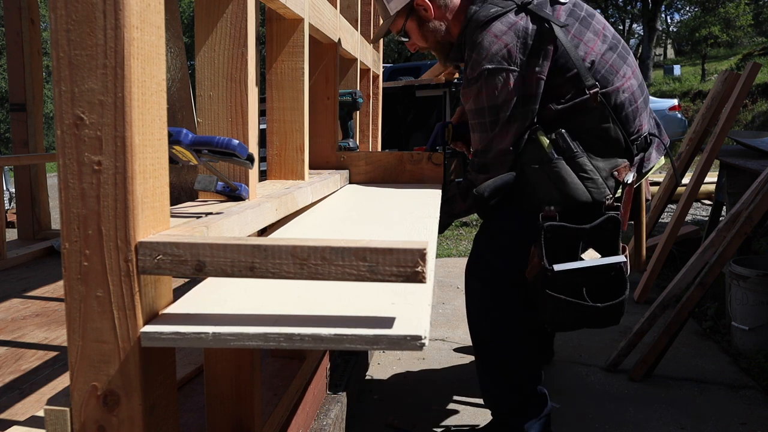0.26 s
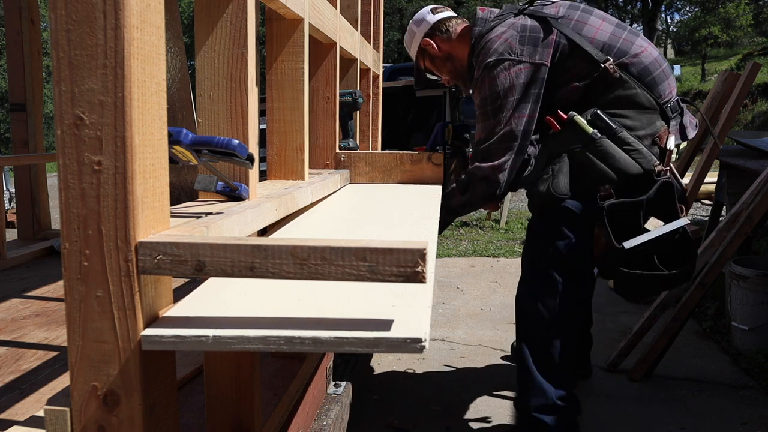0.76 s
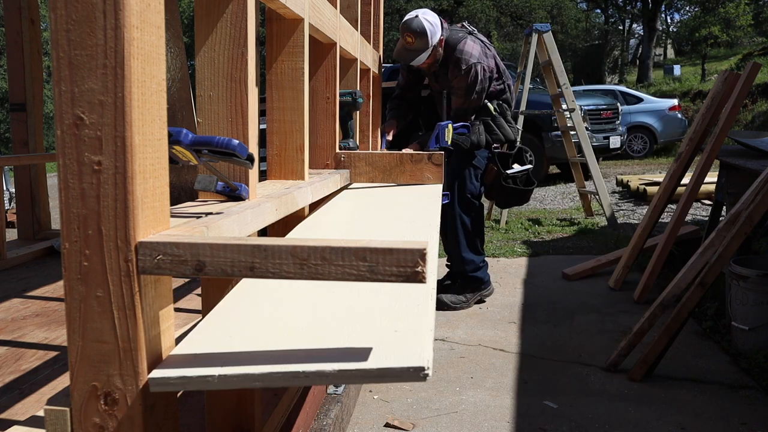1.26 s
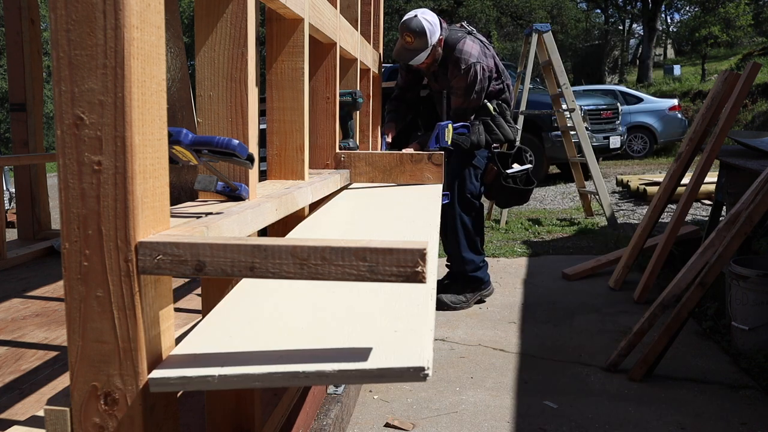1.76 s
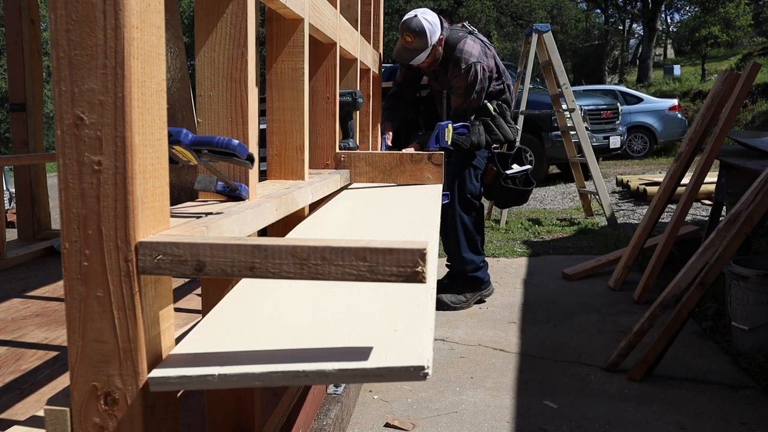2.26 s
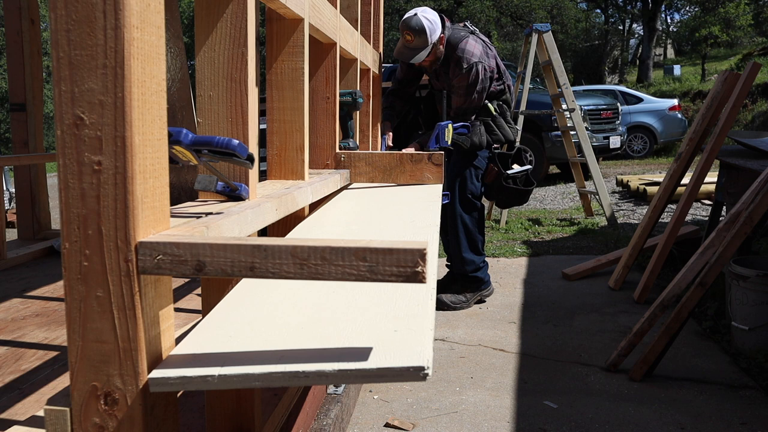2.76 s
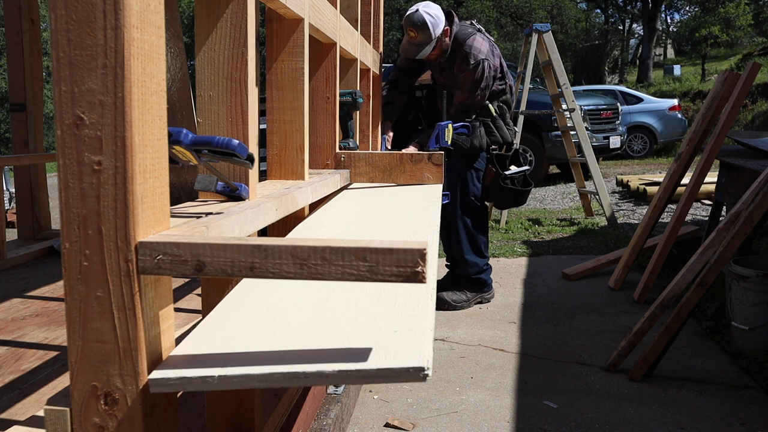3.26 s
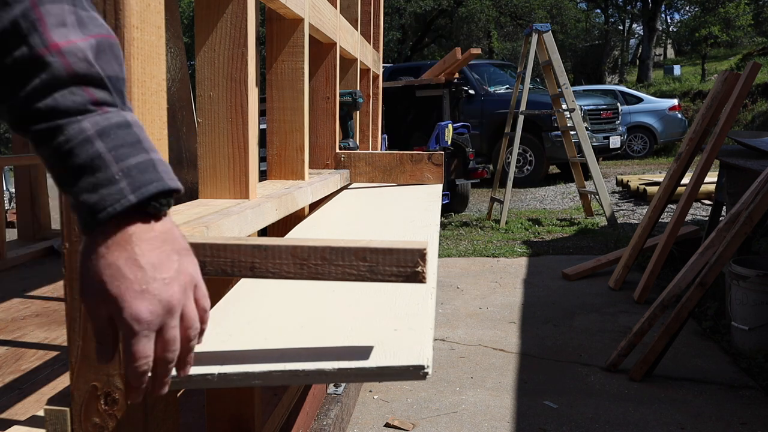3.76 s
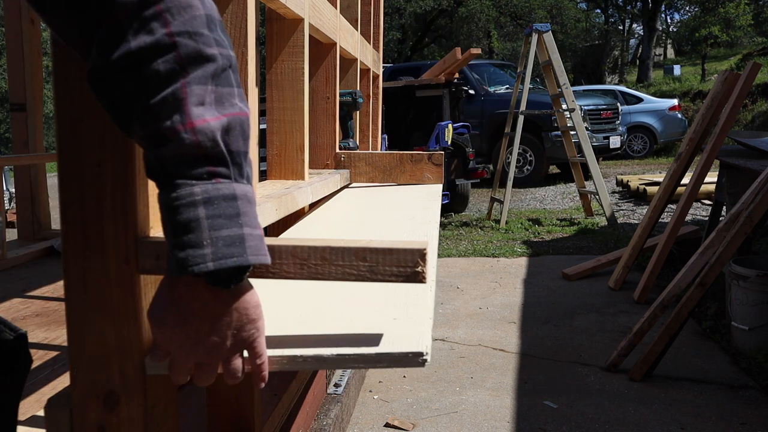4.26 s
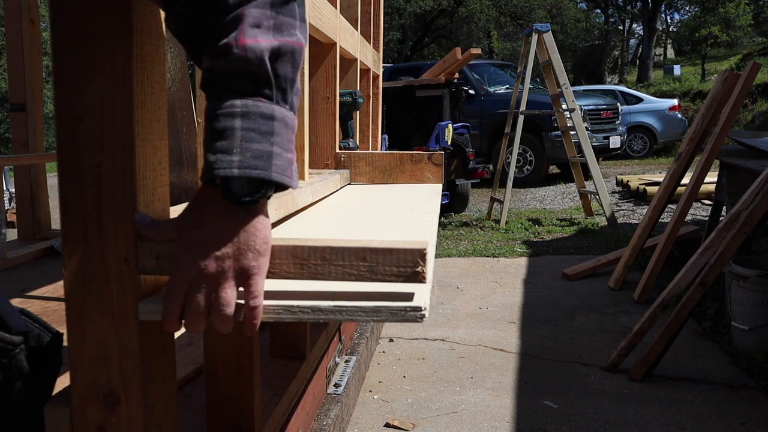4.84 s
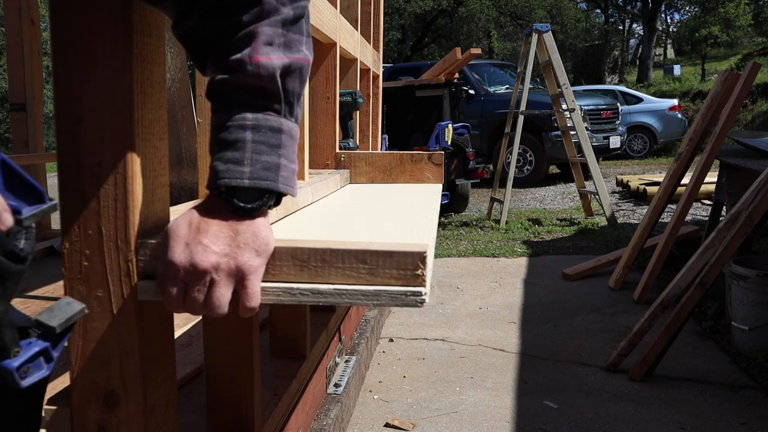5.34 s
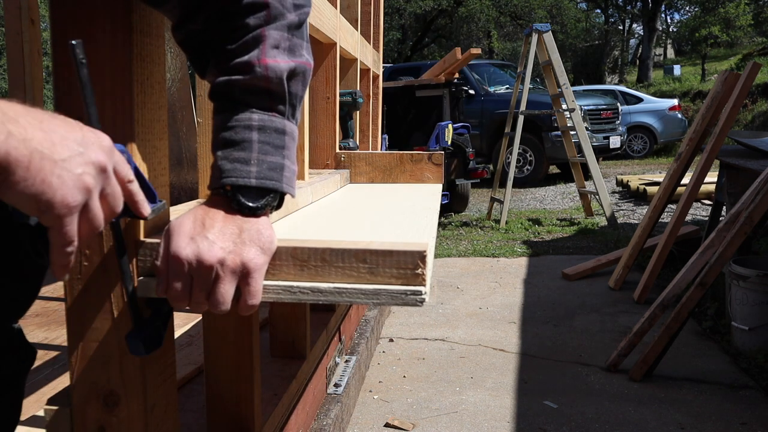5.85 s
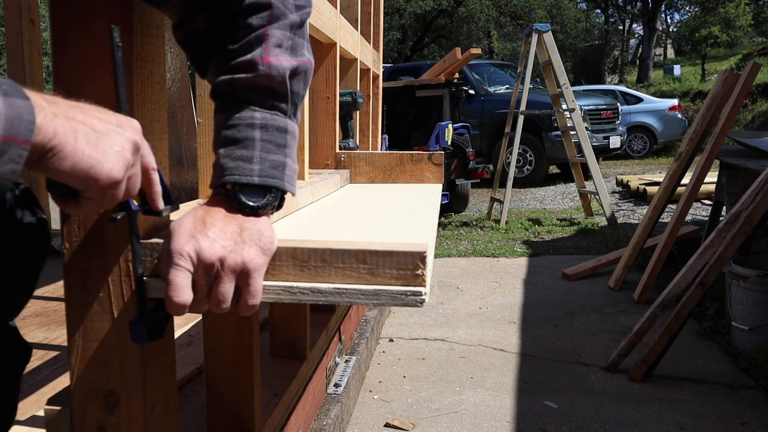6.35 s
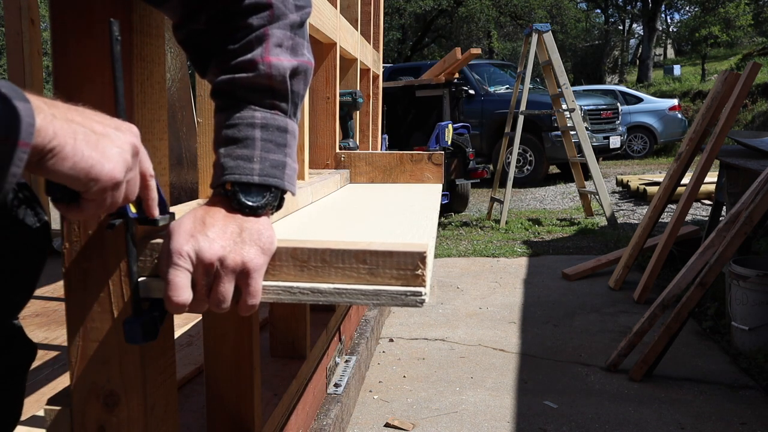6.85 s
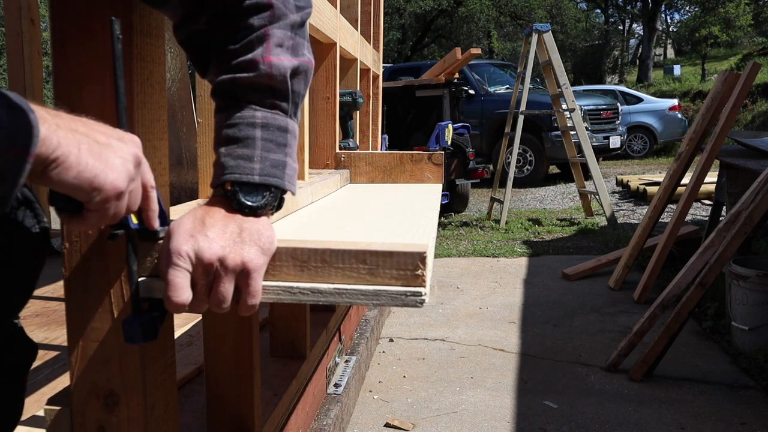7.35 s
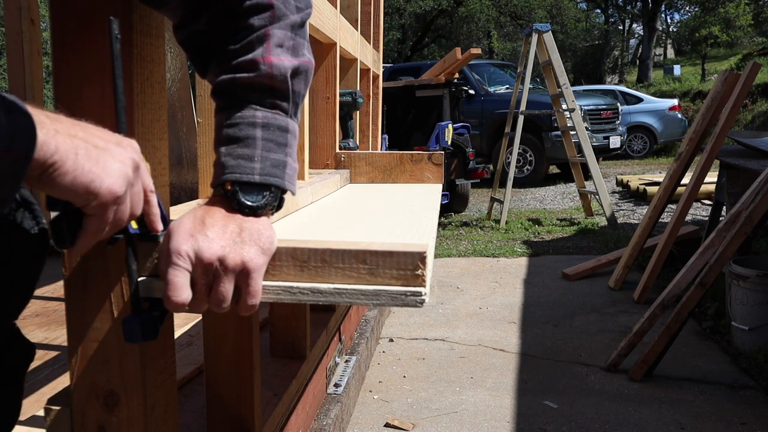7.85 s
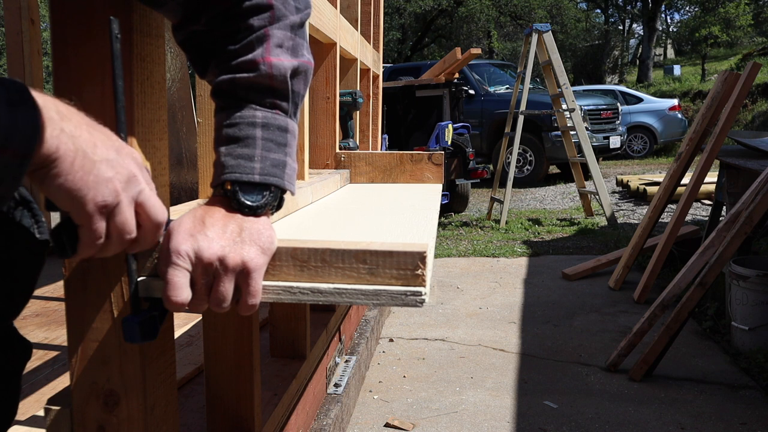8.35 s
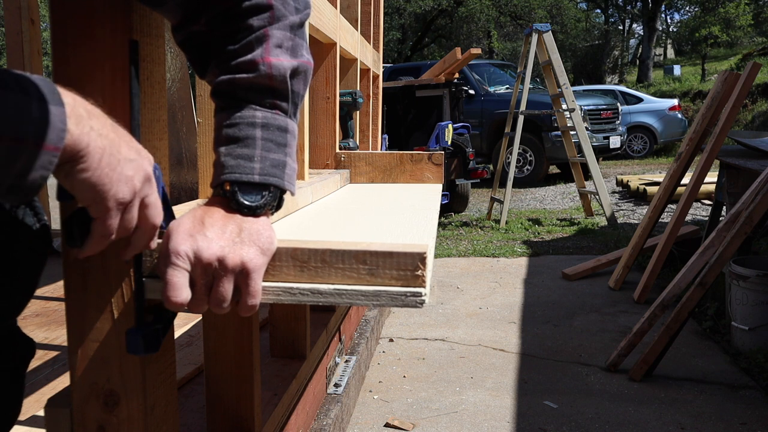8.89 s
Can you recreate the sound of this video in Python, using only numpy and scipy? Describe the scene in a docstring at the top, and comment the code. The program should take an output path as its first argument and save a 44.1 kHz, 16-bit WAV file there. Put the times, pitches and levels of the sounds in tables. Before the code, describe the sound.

A quiet open yard with soft air and microphone hiss and a barely audible high whine. From 0.3 to 1.1 s, somewhat distant boards knock and rub; from 1.0 to 2.1 s a clamp trigger clicks five times, about four per second, each with a loose metallic rattle. A faint far bird gives four tiny whistles around 2.2-2.6 s, while a knock leaves a low board hum; another knock lands at 2.7 s, then a lull. From 3.5 s everything is close: a woody shove at 3.9 s, hand rubbing, scratchy chirps and a brief rising squeak at 4.1-4.5 s, then board scrapes until 5.5 s. Knocks at 5.7-6.4 s peak in hard wood and steel blows. Four loud, dry pumps follow at 6.55, 6.8, 7.03 and 7.3 s. Light taps and clicks continue, then a very sharp metal snap at 8.6 s and clattering knocks until 9 s.

```python
"""Boards are clamped to a timber frame in an open yard, over quiet air, microphone hiss and a faint whine.
At first the work sounds far off: boards knock and the pumped trigger clicks, then a far bird whistles.
From about 3.5 s it sounds close: hands rub, squeaks and short high tones sound, a board slides on its bracket.
Then come hard knocks, four louder pumps and a last burst of clicks and knocks.
Blows ring fixed tones, rubbing drives resonances with tiny random catches, squeaks are gliding sines."""
import sys
import numpy as np
from scipy import signal
from scipy.fft import rfft, irfft
from scipy.io import wavfile
from scipy.ndimage import uniform_filter1d

SR = 44100
rng = np.random.default_rng(int(sys.argv[2]) if len(sys.argv) > 2 else 0)


def dump(signal):
    """Clip the signal to [-1, 1] and save it as 16-bit WAV at the path in sys.argv[1]."""
    limited = np.clip(np.atleast_2d(signal).T, -1, 1)
    pcm = np.round(limited * 32767).astype(np.int16)
    wavfile.write(sys.argv[1], SR, pcm)


N = 402191

# Colour of air and microphone hiss. Each row: frequency in Hz, relative level in dB per Hz.
AIR_COLOUR = [(13, -35), (22, 17.5), (43, 4), (84, 6.5), (172, -15), (371, -7.5), (530, -7), (970, -9.5),
              (1500, -17), (1680, -24), (2210, -23.5), (14300, -23), (15500, -19)]
AIR_DB = -51.5
WHINE_HZ, WHINE_WIDTH_HZ, WHINE_DB = 14805, 12, -78
# A far bird. Each row: start in seconds, start pitch in Hz, end pitch in Hz, length in seconds, level in dB.
BIRD_CHIRPS = [(2.207, 3680, 4080, 0.034, -56), (2.306, 4020, 4050, 0.034, -57),
               (2.406, 3900, 4100, .03, -60), (2.503, 3840, 4230, 0.076, -60)]
# Long low ringing of the timber frame. Each row: start in seconds, pitch in Hz, level in dB, time to fall 60 dB
# in seconds, seconds until it is held.
FRAME_HUMS = [(2.19, 186, -45, 4.0, .48), (2.73, 110, -48, 8.0, .78), (5.71, 165, -42, .6, .3),
              (7.354, 200, -46, .4, .3), (7.64, 190, -44, .5, .3), (7.954, 175, -47, .5, .3),
              (8.237, 210, -42, .4, .3)]

# Steady handling. Each row: time in seconds, rub level in dB, fine hiss level in dB,
# level of the frame's shudder in dB.
HANDLING_LEVELS = [(0.0, -57, -68, -57), (0.15, -49.5, -60, -57), (0.56, -49, -54.5, -49.5),
                   (0.68, -51, -68, -58), (1.2, -59, -63, -46.5), (1.95, -60.5, -69, -53.5),
                   (2.16, -51, -76, -43), (2.3, -55.5, -68, -49), (3.43, -58, -63.5, -54.5),
                   (3.55, -47.5, -66.5, -53), (4.04, -46, -55.5, -53), (4.75, -56.5, -61.5, -53),
                   (5.76, -56, -63.5, -49.5), (6.25, -48.5, -61, -47.5), (6.6, -56, -63.5, -45.5),
                   (7.3, -58.5, -72, -53.5), (8.4, -57.5, -65, -52.5), (9.12, -53.5, -61.5, -42)]
# Single strokes of hand or board. Each row: start in seconds, length in seconds, rub in dB, fine hiss in dB.
HAND_STROKES = [(0.42, 0.078, -40.5, -41.5), (.74, 0.12, -48.5, -55), (.84, 0.058, -43.5, -71),
                (3.494, 0.28, -59, -56.5), (3.898, 0.071, -35, -41), (4.127, 0.071, -59, -77),
                (4.341, 0.086, -51.5, -58), (4.83, .2, -51, -74), (5.28, .14, -48, -80),
                (5.921, 0.068, -48, -54), (6.106, 0.08, -62, -52.5), (6.33, 0.082, -44, -55),
                (6.389, 0.056, -43.5, -61), (7.508, 0.048, -51, -55), (7.595, 0.053, -49.5, -52),
                (7.748, 0.058, -59, -57), (8.595, 0.054, -56, -47), (8.708, 0.054, -53, -58.5),
                (8.827, 0.063, -45, -63)]
# The near board slides up along its bracket. Each row: start in seconds, length in seconds,
# scrape in dB, fine hiss in dB.
BOARD_SLIDES = [(4.66, 0.094, -46, -67), (4.79, 0.073, -49, -59), (4.88, 0.072, -42, -70),
                (5.18, 0.22, -44, -67), (5.41, 0.091, -38.5, -62)]
# The frame is leant on or jolted. Each row: start in seconds, length in seconds, level in dB.
FRAME_JOLTS = [(.82, 0.31, -41.5), (1.52, 0.12, -52), (1.75, 0.18, -47), (2.7, 0.18, -49), (5.2, 0.18, -44),
               (5.82, 0.11, -43), (6.28, 0.199, -31.5), (8.6, 0.16, -47.5), (8.78, 0.18, -36)]
# Resonances of the rub, its fine hiss, the sliding board and the frame.
# Each row: frequency in Hz, width in Hz, relative level in dB.
RUB_PEAKS = [(515, 550, 5), (1324, 237, 6.5), (1650, 350, 3.5), (2500, 540, 5), (3100, 2400, -1)]
HISS_PEAKS = [(4130, 2500, 2), (6240, 5100, 1.5), (8830, 1630, 1.5), (12700, 2000, -14.5)]
SLIDE_PEAKS = [(1340, 130, 3), (1800, 350, -1), (2350, 400, -1), (3200, 800, -11)]
SHUDDER_PEAKS = [(81, 18, -17), (123.6, 44, -0.5), (178, 63.7, 2), (225, 54.3, 2.5), (300, 131, -4),
                 (456, 155, -5.5), (606, 172, -10)]
RUB_TOP_HZ, SHUDDER_FLICKER_DB = 3130, 1.5

# Stick-slip squeaks, a full and a thin one. Each row: time in seconds, pitch in Hz, level in dB.
FULL_SQUEAK = [(4.378, 1540, -52), (4.415, 1560, -50), (4.426, 1600, -58), (4.434, 1650, -43),
               (4.464, 1680, -44), (4.472, 1800, -53), (4.482, 1870, -47), (4.51, 1870, -50),
               (4.545, 1860, -57)]
THIN_SQUEAK_CURVE = [(4.03, 12000, -77), (4.058, 12103, -56), (4.078, 12300, -70), (4.16, 12150, -48),
                     (4.174, 12200, -65), (4.26, 12129, -71), (4.27, 12500, -81)]
# Tones inside each squeak. Each row: multiple of the pitch, relative level in dB.
FULL_SQUEAK_TONES = [(1, 0), (2, -13), (3, -18), (4, -22)]
THIN_SQUEAK_TONES = [(1, 3), (.5, -11)]
# Short scratchy high tones, gliding a little. Each row: start in seconds, start pitch in Hz,
# end pitch in Hz, length in seconds, level in dB.
HIGH_CHIRPS = [(4.13, 2170, 2130, 0.035, -41.5), (4.338, 6000, 6130, .03, -48),
               (4.338, 10100, 10200, 0.026, -50), (4.35, 3580, 3700, 0.012, -45),
               (4.355, 11900, 11800, .04, -61), (4.38, 4280, 4100, 0.018, -48),
               (4.385, 6500, 7000, 0.091, -52), (4.385, 13200, 13400, .06, -59)]

# Wood on wood. Each row: time in seconds, loudness at the loudest moment in dB, brightness in dB per octave.
BOARD_KNOCKS = [(0.421, -27.5, -1), (0.487, -37, 2.5), (0.865, -29, -3.5), (0.885, -31, -4.5),
                (0.95, -24.5, -7.5), (1.007, -27.5, -8), (1.257, -32, 0), (1.328, -39, 7),
                (1.632, -31, -24.5), (1.683, -39.5, -18), (1.756, -33, 14), (2.178, -29.5, -5.5),
                (2.589, -50, 5), (2.727, -25, 7.5), (3.365, -41, 9), (3.554, -33, 3.5), (3.928, -32, -1),
                (4.332, -35.5, 6.5), (4.39, -35, 10.5), (5.185, -35, 0), (5.266, -32.5, 0.5),
                (5.711, -37.5, -1.5), (5.824, -26, -1.5), (5.943, -35, -1), (6.199, -16.5, 0.5),
                (6.298, -18.5, 10), (6.421, -25.5, -2), (6.654, -36.5, -8), (7.088, -42, 0),
                (7.352, -37, -5), (7.64, -35, -5), (7.788, -37, 14), (7.954, -40.5, -11),
                (8.239, -35.5, -4), (8.585, -22, -3.5), (8.791, -27, -6), (8.822, -22.5, 3.5),
                (8.946, -23.5, 3), (8.968, -24, -18.5)]
# A board end dragged home, swelling before it stops. Each row: time in seconds, loudest level in dB,
# brightness in dB per octave, narrowness in dB per octave squared (below 0 counts as 0),
# time for the chatter to fall 60 dB in seconds (above 0.3 counts as 0.3).
BOARD_SHOVES = [(0.29, -40, -5, 3.5, 0.12), (0.421, -31.5, 12, 7.5, 0.42), (0.78, -37, 4, -1.5, 0.39),
                (1.005, -49, 6, -3, 0.11), (2.572, -37, -2, 2.5, 0.19), (2.705, -40, 1.5, 0, 0.2),
                (3.51, -45, 6, 4, 0.13), (3.899, -21.5, 0.5, 4.5, 0.15), (8.582, -39, -1, -2.5, 0.4)]
# Ringing tones of boards and of the clamp.
# Each row: frequency in Hz, relative level in dB, time to fall 60 dB in seconds.
BOARD_MODES = [(118.3, -12.5, 0.23), (174, -4.5, 0.37), (207.4, 7, 0.063), (255.3, -1.5, 0.18),
               (320.4, 3, 0.044), (424, -10.5, 0.13), (460.8, -7.5, 0.18), (487, 1, 0.038),
               (573.6, 0.5, 0.074), (710, 0, 0.034), (875, 1, 0.025), (1013, 0, 0.033), (1180, 6.5, 0.011),
               (1410, -4, 0.022), (1850, -4, 0.011), (2104, -4, 0.023), (2430, 9.5, 0.0028),
               (3550, -9, 0.024), (4400, -8, 0.01), (6000, 1, 0.0019), (8700, -0.5, 0.0019),
               (13000, -6, 0.0015)]
CLAMP_MODES = [(720, 8, 0.018), (950, -27, 0.011), (1110, -35, 0.0048), (1284, 20.5, 0.014),
               (1657, 19, 0.0094), (2210, -6.5, 0.027), (2520, -4, 0.002), (2910, 18.5, 0.0018),
               (3330, -24, 0.022), (3400, -12, 0.032), (4160, 1, 0.01), (4152, -3.5, 0.011),
               (5000, 9, 0.0014), (5480, -4, 0.0088), (7020, 5, 0.0015), (8060, -6, 0.0082),
               (8470, -8.5, 0.0067), (9210, -8, 0.01), (9900, 0, 0.0011), (12100, -13, 0.0061),
               (13500, -12, 0.0025)]
MODE_SPREAD_DB = 2.5   # the strike point changes from blow to blow
# The struck part rebounds. Each row: delay after the snap in seconds, share of the snap's size.
REBOUNDS = [(.0042, 0.2), (.0075, 0.38)]
KNOCK_T60_S, USUAL_DB = 0.053, -30   # chatter time of a knock at the usual level
LONGER_PER_DB = 0.25   # harder knocks stay in contact longer: dB of time per dB of level
KNOCK_NARROW_DB, NARROW_PER_BRIGHT = 1.5, 0.89   # a brighter knock is also more hollow

# Trigger pumps, where the pawl snaps over. Each row: time in seconds, loudest level in dB.
TRIGGER_PUMPS = [(1.0209, -29), (1.257, -29.5), (1.5067, -28.5), (1.7554, -30.5), (2.0744, -33),
                 (6.5518, -19.5), (6.7947, -20.5), (7.033, -20), (7.2851, -21.5)]
# Other clicks of the clamp. Each row: time in seconds, loudest level in dB, brightness in dB per octave.
CLAMP_CLICKS = [(0.44, -26.5, 13), (0.5523, -45, 4), (0.633, -32, 6), (0.681, -30.5, 7),
                (0.838, -35.5, 6.5), (0.9425, -48.5, 1), (1.0035, -42, -18), (1.6255, -46.5, -1),
                (1.737, -44, 8), (1.86, -46, -8), (2.066, -33, -16), (2.159, -36, 2), (2.5879, -29.5, 3.5),
                (2.7047, -36, 3.5), (2.7238, -29.5, -4), (3.1327, -47.5, 0), (3.367, -41, -5),
                (3.556, -31, 17.5), (3.678, -39, 29), (3.8734, -25.5, 23), (3.9064, -31.5, 28),
                (4.1842, -36, 21), (4.888, -44, -20), (5.0622, -32, 12.5), (5.251, -36, -13),
                (5.7147, -31, 0.5), (5.827, -29.5, -7.5), (5.932, -41, -14), (5.9562, -36, -7),
                (6.049, -41, 2.5), (6.0875, -37, 1.5), (6.2005, -27, -3), (6.2964, -18.5, 9),
                (6.355, -34, 18), (6.3723, -33, -1), (6.391, -16.5, 2), (6.6742, -29.5, 3.5),
                (7.1667, -40, 0), (7.6116, -43, 3), (7.638, -36, -5), (7.7893, -24, 3.5),
                (8.1934, -32, 5.5), (8.357, -39, 1.5), (8.5823, -26, 6), (8.5928, -13, 10.5),
                (8.5969, -20.5, 8.5), (8.7134, -36, 2), (8.7929, -25, 2.5), (8.8273, -28.5, -3),
                (8.914, -41, 3), (8.941, -24, 4.5), (9.01, -40.5, -6)]
CLICK_NARROW_DB = 4.5   # per octave squared
RATTLE_T60_S, TIGHT_FROM_S = (0.083, 0.032), 2.3   # other clicks: (clamp still loose, tight)
NEAR_FROM_S = 3.45   # events sound far before this time and near after it
# What every pump shares, as (far, near)
PUMP_BRIGHT_DB, PUMP_NARROW_DB = (8.5, 10), (6, 5.5)   # per octave, per octave squared
PUMP_T60_S = (.085, .018)   # rattle after the snap
SNAP = (5.2, 9)   # size of the first contact against the rattle, for every clamp blow
# The trigger springs back: delay, level against the snap, narrowness per octave squared
RETURN_S, RETURN_DB, RETURN_NARROW_DB = (.057, .049), (-9, -21), (22, 4.5)
# The hand closes up to the snap
PULL_S, PULL_RUB_DB, PULL_HISS_DB = 0.033, (-51.5, -55.5), (-66, -54.5)
# The jaw creeps on after the snap
SQUEEZE_AFTER_S, SQUEEZE_S = (.0, 0.064), (.13, 0.073)
SQUEEZE_RUB_DB, SQUEEZE_HISS_DB = (-50, -47), (-63.5, -52.5)

# Scatter from studs, slab and wall
YARD_DB, YARD_DELAY_S, YARD_T60_S, ECHO_CUT_HZ = -9.5, 0.004, 0.15, 4500
MIC_LOW_HZ, CUTOFF_HZ = 64.7, 16500


def from_db(db):
    """Turn decibels into gain."""
    return 10 ** (np.asarray(db) / 20)


def rms_one(x):
    """Scale a sound to an average (rms) strength of 1."""
    return x / np.sqrt(np.mean(x ** 2) + 1e-20)


def in_time(rows):
    """Draw lines between the rows of a timed table, one curve for each column after the time."""
    s, *columns = np.transpose(rows)
    return [np.interp(np.arange(N) / SR, s, column) for column in columns]


def drift(rate):
    """Wander slowly by chance: coarse noise smoothed twice at a rate in Hz, with a spread of 1."""
    r = np.exp(-80 * np.pi * rate / SR)   # one noise value for every 40 samples
    noise = rng.standard_normal(N // 40 + 2002)
    slow = rms_one(signal.lfilter([1], [1, -2 * r, r * r], noise)[2000:])
    return np.interp(np.arange(N) / 40, np.arange(len(slow)), slow)


def resonate(x, peaks):
    """Pass a sound through side-by-side resonances with alternating signs; rms 1."""
    out = 0
    for k, (hz, width, level_db) in enumerate(peaks):
        r = np.exp(-np.pi * width / SR)
        poles = [1, -2 * r * np.cos(2 * np.pi * hz / SR), r * r]
        zeros = [(1 - r * r) / 2, 0, (r * r - 1) / 2]
        out = out + (-1) ** k * from_db(level_db) * signal.lfilter(zeros, poles, x)
    return rms_one(out)


def by_place(s, pair):
    """Pick the far or the near value of a pair by the time of the event."""
    return pair[int(s > NEAR_FROM_S)]


def air():
    """Air and microphone hiss is noise of a fixed colour; a faint narrow whine lies on top."""
    hz = np.maximum(np.fft.rfftfreq(N + 1, 1 / SR), 1)
    colour_hz, colour_db = np.transpose(AIR_COLOUR)
    shape = from_db(np.interp(np.log(hz), np.log(colour_hz), colour_db))
    hiss = rms_one(irfft(rfft(rng.standard_normal(N + 1)) * shape)[:N])
    peak = [(WHINE_HZ, WHINE_WIDTH_HZ, 0)]
    whine = resonate(resonate(rng.standard_normal(N), peak), peak)
    return from_db(AIR_DB) * hiss + from_db(WHINE_DB) * whine


def whistles(rows, waver, flicker_db):
    """Short gliding tones swell and fade; wavering pitch and flickering level make them scratchy."""
    out = np.zeros(N)
    bend = 1 + waver * drift(150)
    for s, from_hz, to_hz, length, level_db in rows:
        t = np.arange(int(length * SR)) / SR
        span = slice(int(s * SR), int(s * SR) + len(t))
        pitch_hz = (from_hz + (to_hz - from_hz) * t / length) * bend[span]
        phase = 2 * np.pi * np.cumsum(pitch_hz) / SR
        out[span] += from_db(level_db) * np.sin(np.pi * t / length) * np.sin(phase)
    return out * from_db(flicker_db * drift(100))


def bird():
    """A far bird gives short rising whistles with only a slight waver."""
    return whistles(BIRD_CHIRPS, waver=.003, flicker_db=6.0)


def hums():
    """After some knocks one low tone of the frame dies slowly, damped when the frame is next held."""
    out = np.zeros(N)
    for s, hz, level_db, t60, free_s in FRAME_HUMS:
        t = np.maximum(np.arange(N) / SR - s, 0)
        free = (1 - np.exp(-t / 0.011)) * np.exp(-(t / free_s) ** 8)
        out += from_db(level_db - 60 * t / t60) * free * np.sin(2 * np.pi * hz * t)
    return out * from_db(2.5 * drift(5.0))


def rubbing(gain, peaks, grains_per_s, grain_db, flicker_db):
    """Many uneven catches of two surfaces drive the resonances, while the pressure flickers."""
    sizes = from_db(grain_db * np.minimum(rng.exponential(1, N), 4)) * rng.choice([-1, 1], N)
    grains = sizes * (rng.random(N) < grains_per_s / SR)
    return gain * from_db(flicker_db * drift(8.8)) * resonate(grains, peaks)


def strokes(rows, softness):
    """Pressure rises, holds and lets go: one gain per level column; more softness rounds the edges."""
    t, gains = np.arange(N) / SR, 0
    for start, length, *levels_db in rows:
        pressure = np.sin(np.pi * np.clip((t - start) / length, 0, 1)) ** softness
        gains = gains + from_db(levels_db)[:, None] * pressure
    return gains


def pump_strokes():
    """Each pump rubs twice: the hand pulls before the snap and the jaw squeezes after it."""
    rows = []
    for s, _ in TRIGGER_PUMPS:
        rows.append((s - PULL_S, PULL_S, by_place(s, PULL_RUB_DB), by_place(s, PULL_HISS_DB)))
        rows.append((s + by_place(s, SQUEEZE_AFTER_S), by_place(s, SQUEEZE_S),
                     by_place(s, SQUEEZE_RUB_DB), by_place(s, SQUEEZE_HISS_DB)))
    return rows


def handling():
    """Hands rub, a board scrapes and the frame shudders: catching surfaces drive each one's resonances."""
    rub, hiss, shudder = from_db(in_time(HANDLING_LEVELS))
    rub_strokes, hiss_strokes = strokes(list(HAND_STROKES) + pump_strokes(), softness=0.31)
    scrape, hiss_slides = strokes(BOARD_SLIDES, softness=0.58)
    jolts = strokes(FRAME_JOLTS, softness=0.37)[0]
    out = rubbing(rub + rub_strokes, RUB_PEAKS, grains_per_s=4000, grain_db=1.0, flicker_db=1.26)
    out += rubbing(scrape, SLIDE_PEAKS, grains_per_s=2000, grain_db=-0.5, flicker_db=3.5)
    # Skin and wood are soft, so rub and scrape lose their treble
    out = signal.sosfilt(signal.butter(2, RUB_TOP_HZ, fs=SR, output="sos"), out)
    out += rubbing(hiss + hiss_strokes + hiss_slides, HISS_PEAKS,
                   grains_per_s=12000, grain_db=3.5, flicker_db=3.0)
    out += rubbing(shudder + jolts, SHUDDER_PEAKS,
                   grains_per_s=1500, grain_db=0.5, flicker_db=SHUDDER_FLICKER_DB)
    return out


def squeak(rows, orders, waver, flicker_db):
    """Regular slips make a few multiples of one wavering pitch, only while the surfaces grip."""
    pitch_hz, level_db = in_time(rows)
    phase = 2 * np.pi * np.cumsum(pitch_hz * (1 + waver * drift(48))) / SR
    start, end = rows[0][0], rows[-1][0]
    grip = np.interp(np.arange(N) / SR, [start - .01, start, end, end + .01], [0, 1, 1, 0])
    tone = sum(from_db(db + flicker_db * drift(36)) * np.sin(k * phase) for k, db in orders)
    return np.sqrt(2) * grip * from_db(level_db) * tone


def squeaks():
    """Surfaces stick and slip fast enough to sing, a full and a thin squeak."""
    out = squeak(FULL_SQUEAK, FULL_SQUEAK_TONES, waver=.008, flicker_db=4)
    return out + squeak(THIN_SQUEAK_CURVE, THIN_SQUEAK_TONES, waver=0.0021, flicker_db=5.0)


def high_chirps():
    """Short high gliding tones sound scratchy because pitch and level waver fast."""
    return whistles(HIGH_CHIRPS, waver=.02, flicker_db=4.5)


def blows(events, modes, pivot_hz, rise_s, snap, least_narrow_db=0, size=16384):
    """Each blow is a snap, its rebounds and a dying chatter, rung through modes with strengths of its own."""
    s, peak_db, bright_db, narrow_db, chatter_t60 = np.transpose(events)[:, :, None]
    hz, level_db, t60 = np.transpose(modes)[:, :, None]
    t = np.arange(size) / SR
    signs = (-1) ** np.arange(len(hz))[:, None]   # neighbouring modes move the surface in opposite ways
    ringing = rfft(signs * from_db(-60 * t / t60) * np.sin(2 * np.pi * hz * t))
    # Brightness tilts the modes around the pivot; narrowness weakens those far from it
    octaves = np.log2(hz.T / pivot_hz)
    tilt_db = bright_db * octaves - np.maximum(narrow_db, least_narrow_db) * octaves ** 2
    chance_db = MODE_SPREAD_DB * rng.standard_normal((len(s), len(hz)))
    strengths = from_db(level_db.T + tilt_db + chance_db)
    swell = (1 - np.exp(-(t / rise_s) ** 2)) * from_db(-60 * t / np.clip(chatter_t60, 1e-3, .3))
    contacts = rng.standard_normal((len(s), size)) * swell
    contacts[:, 0] = snap
    for lag_s, share in REBOUNDS:
        contacts[:, int(lag_s * SR)] += share * snap
    sounds = irfft(rfft(contacts) * (strengths @ ringing))
    # Level is set by the loudest 4 ms or so of each blow
    loudest = np.sqrt(uniform_filter1d(sounds ** 2, size=180, axis=1).max(axis=1))
    gains = from_db(peak_db[:, 0]) / loudest
    out = np.zeros(N + size)
    for start, sound, gain in zip((s[:, 0] * SR).astype(int), sounds, gains):
        out[start:start + size] += gain * sound
    return out[:N]


def boards():
    """Knocked boards ring, and chatter longer when hit harder; shoved boards swell up slowly."""
    knocks = []
    for s, db, bright in BOARD_KNOCKS:
        narrow = KNOCK_NARROW_DB + NARROW_PER_BRIGHT * bright
        chatter_t60 = KNOCK_T60_S * from_db(LONGER_PER_DB * (db - USUAL_DB))
        knocks.append((s, db, bright, narrow, chatter_t60))
    out = blows(knocks, BOARD_MODES, pivot_hz=428, rise_s=0.0026, snap=4.06, least_narrow_db=2)
    return out + blows(BOARD_SHOVES, BOARD_MODES, pivot_hz=1300, rise_s=0.0088, snap=0.11)


def clamp():
    """Steel rings at the snap and spring-back of every pump and at other clicks; loose, it rattles longer."""
    rows = []
    for s, db, bright in CLAMP_CLICKS:
        rows.append((s, db, bright, CLICK_NARROW_DB, RATTLE_T60_S[int(s > TIGHT_FROM_S)]))
    for s, db in TRIGGER_PUMPS:
        bright, t60 = by_place(s, PUMP_BRIGHT_DB), by_place(s, PUMP_T60_S)
        rows.append((s, db, bright, by_place(s, PUMP_NARROW_DB), t60))
        rows.append((s + by_place(s, RETURN_S), db + by_place(s, RETURN_DB), bright,
                     by_place(s, RETURN_NARROW_DB), t60))
    snaps = np.array([by_place(row[0], SNAP) for row in rows])
    return blows(rows, CLAMP_MODES, pivot_hz=3060, rise_s=0.00015, snap=snaps)


def yard(x):
    """Studs, slab and wall return many small dull reflections that die fast."""
    t = np.arange(SR // 2) / SR
    fade = from_db(-60 * t / YARD_T60_S) * (1 - np.exp(-(t / YARD_DELAY_S) ** 2))
    scatter = rng.standard_normal(len(t)) * fade
    dull = signal.sosfilt(signal.butter(1, ECHO_CUT_HZ, fs=SR, output="sos"), x)
    return from_db(YARD_DB) * signal.fftconvolve(dull, scatter / np.linalg.norm(scatter))[:N]


def scene():
    """Add up air, bird, hums, handling, squeaks, high tones, and the blows with their echoes."""
    background = air() + bird() + hums()
    friction = handling() + squeaks()
    hits = boards() + clamp()
    return (background + friction + high_chirps() + hits + yard(hits))[None]


def record(dry):
    """The microphone loses deep bass; the top is cut."""
    thin = signal.sosfilt(signal.butter(2, MIC_LOW_HZ, "high", fs=SR, output="sos"), dry)
    return signal.sosfilt(signal.cheby2(12, 70, CUTOFF_HZ, fs=SR, output="sos"), thin)


dry = scene()
out = record(dry)
dump(out)
```